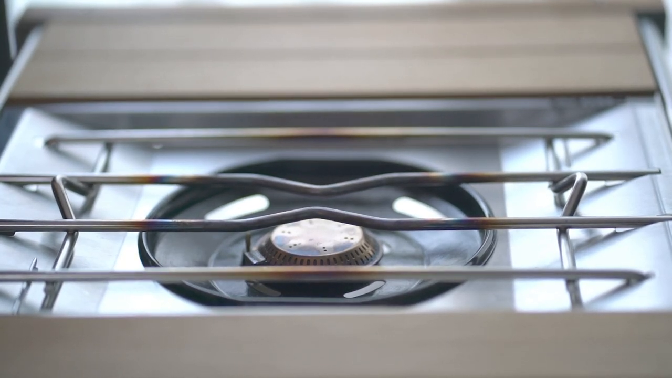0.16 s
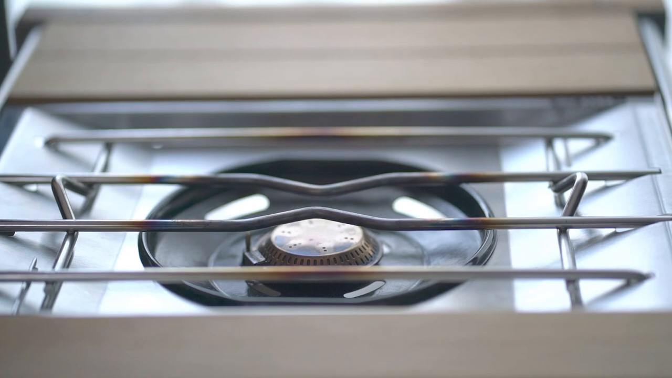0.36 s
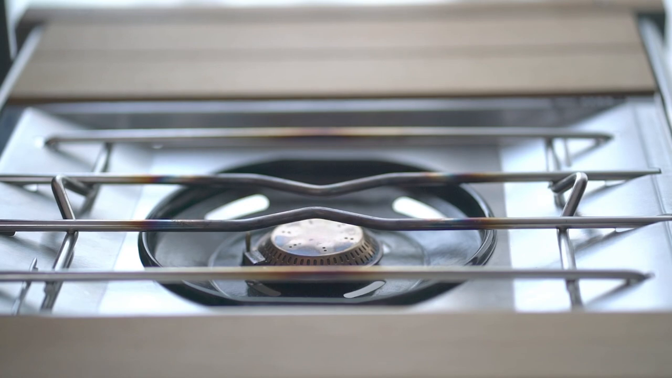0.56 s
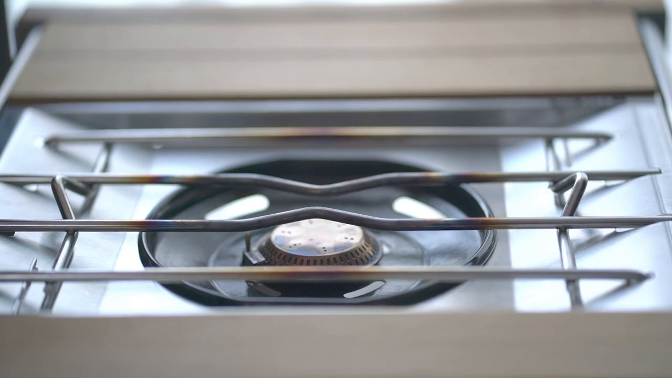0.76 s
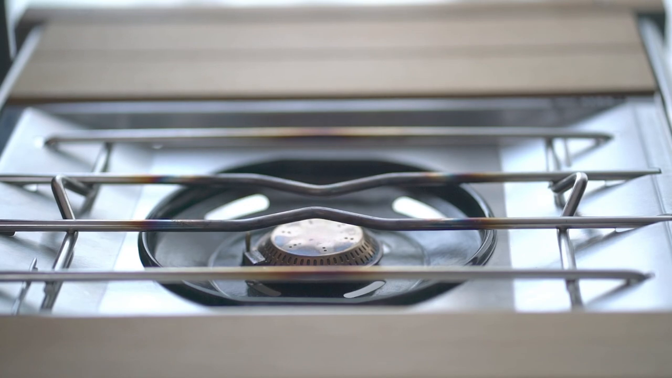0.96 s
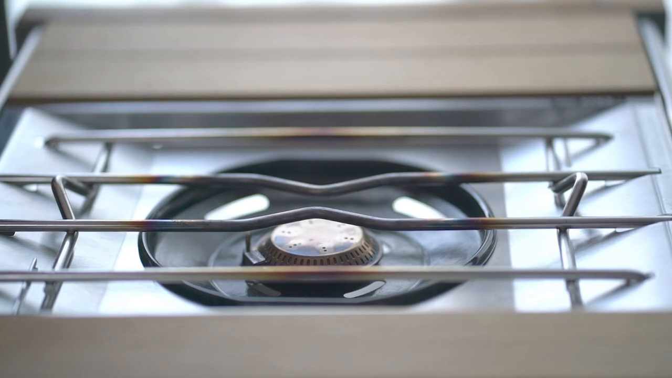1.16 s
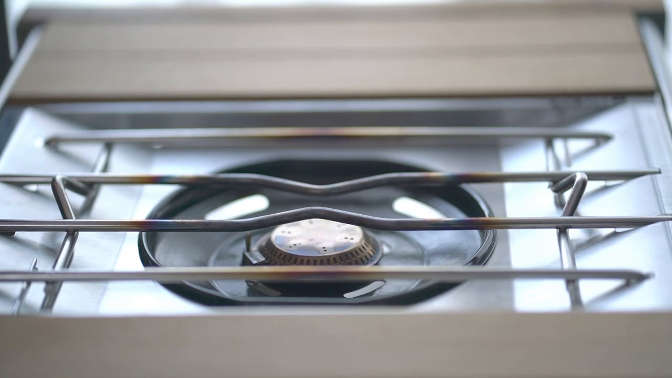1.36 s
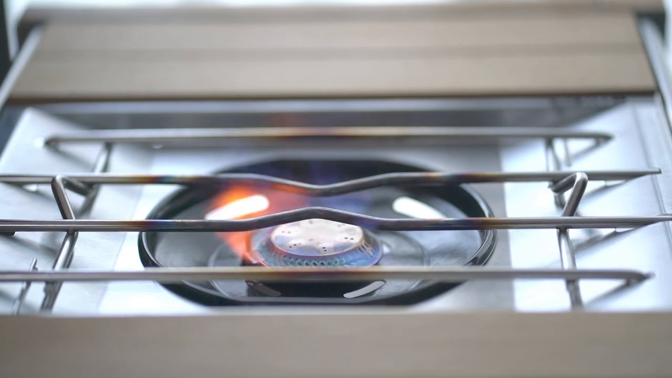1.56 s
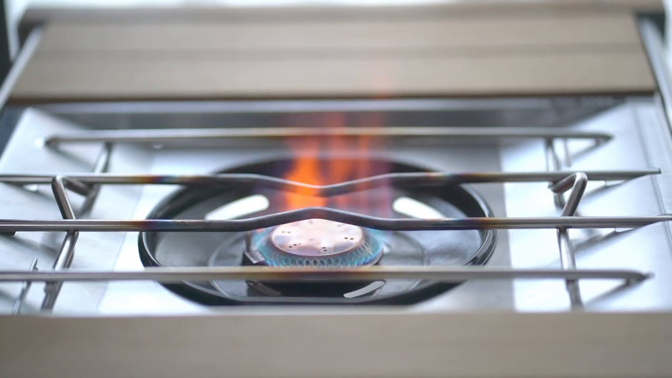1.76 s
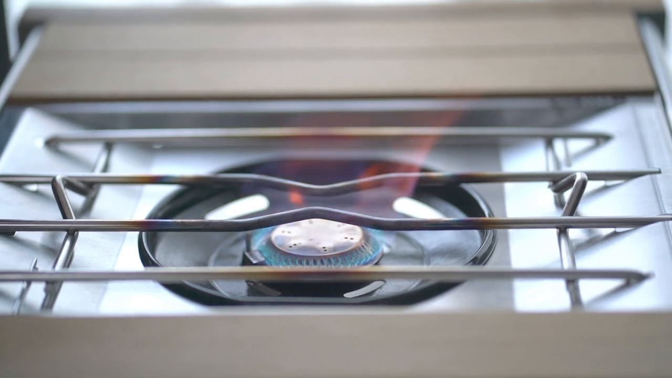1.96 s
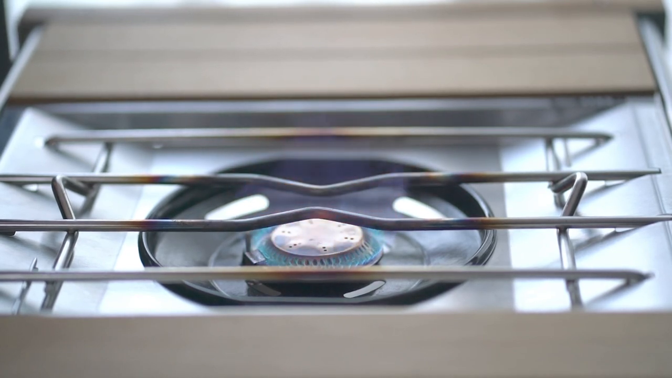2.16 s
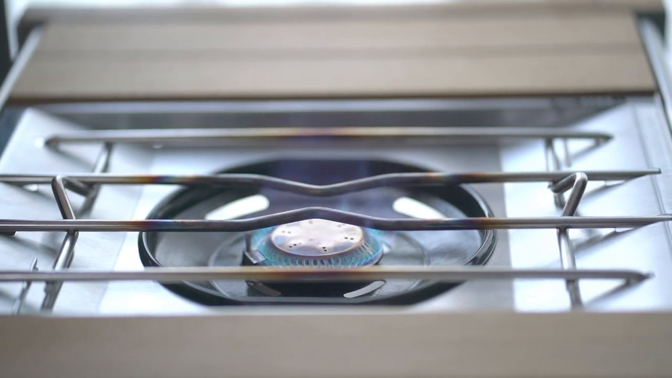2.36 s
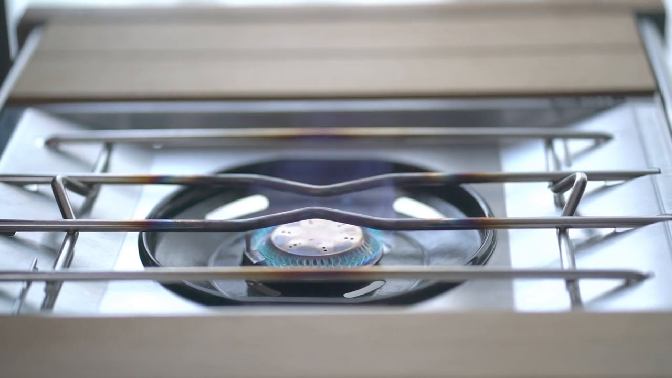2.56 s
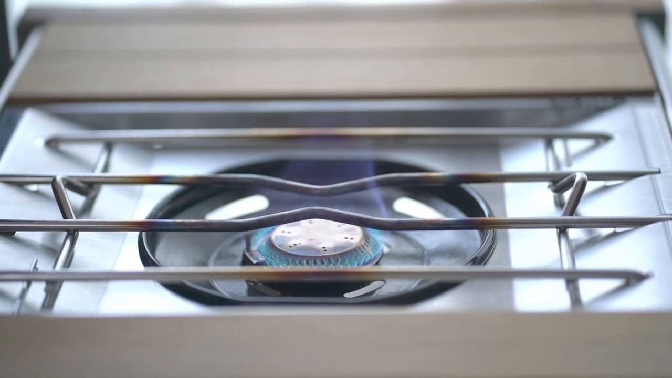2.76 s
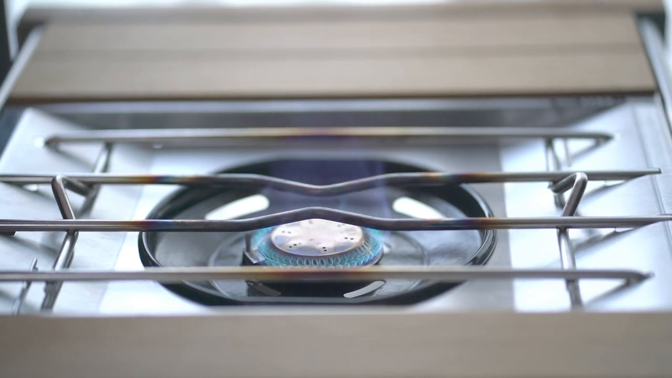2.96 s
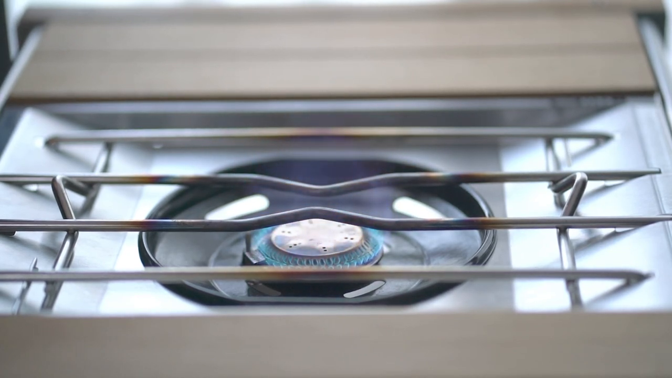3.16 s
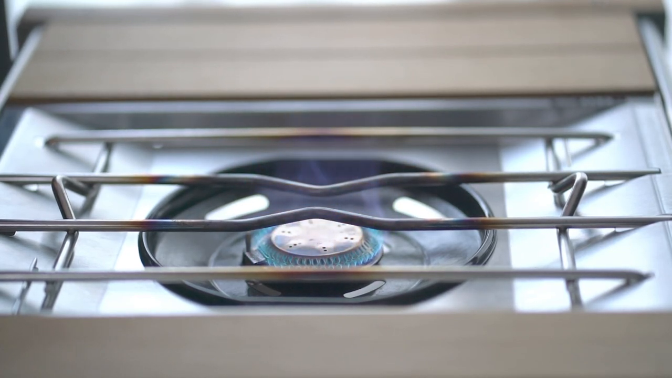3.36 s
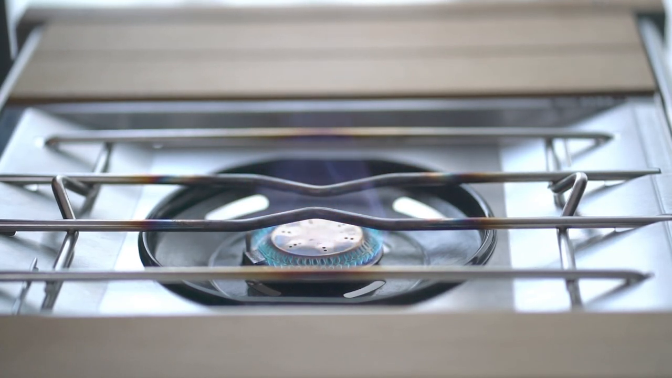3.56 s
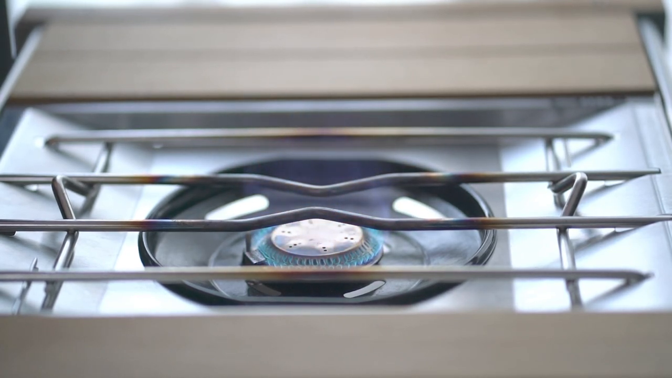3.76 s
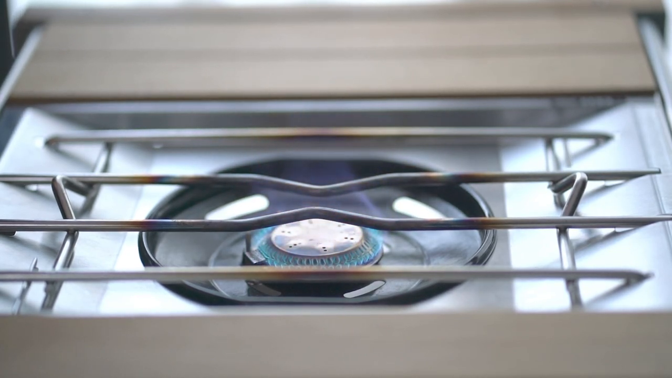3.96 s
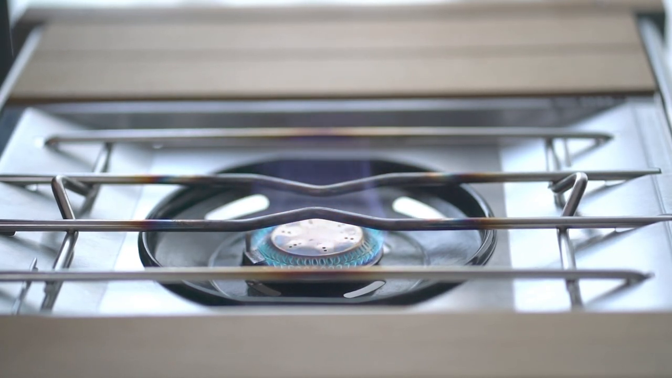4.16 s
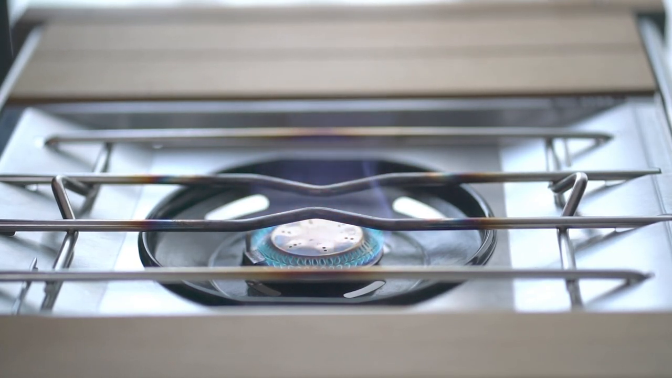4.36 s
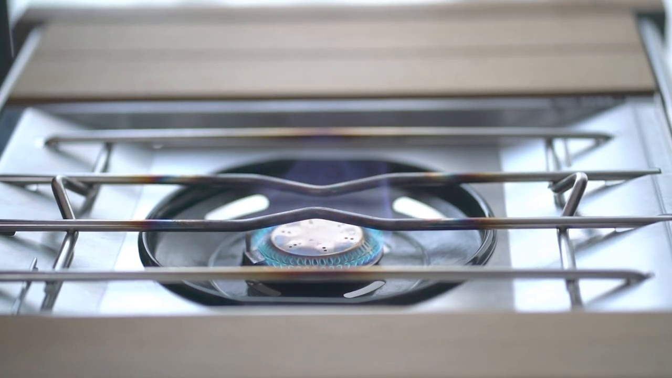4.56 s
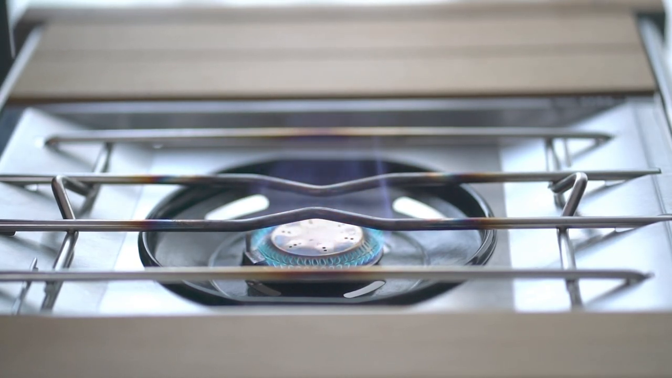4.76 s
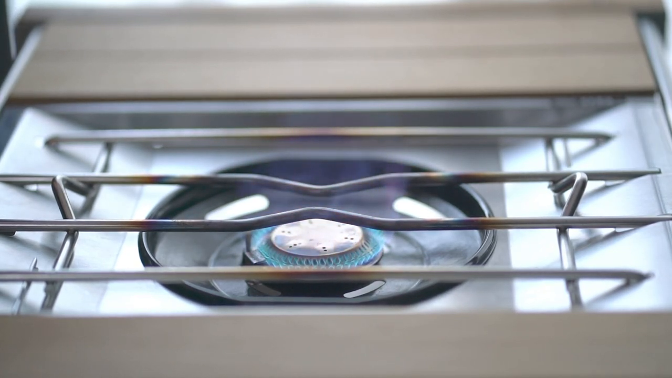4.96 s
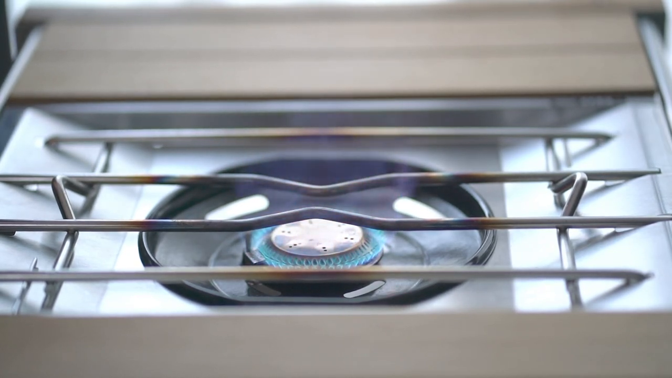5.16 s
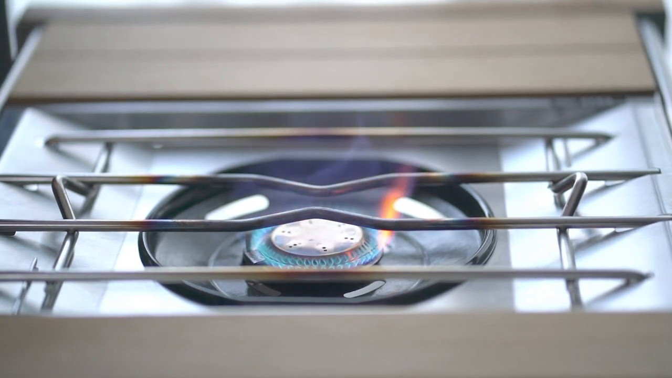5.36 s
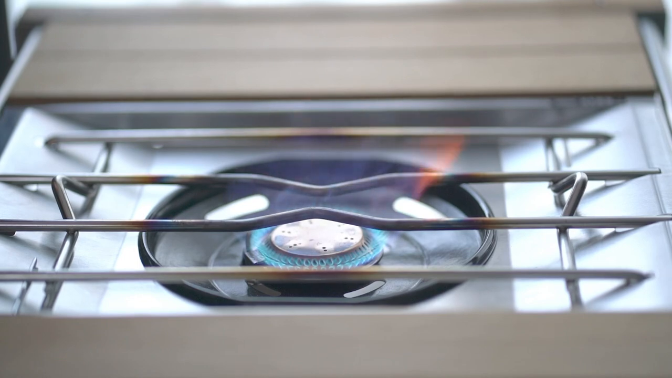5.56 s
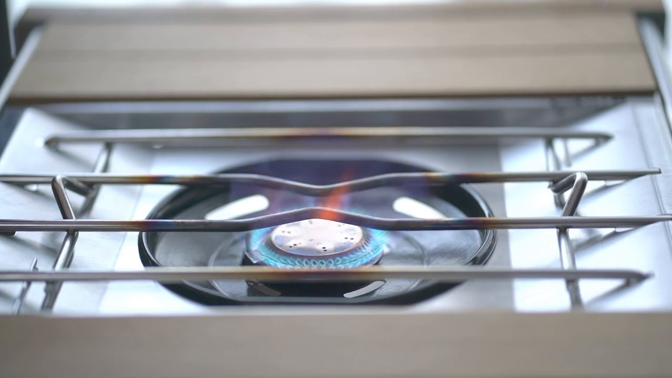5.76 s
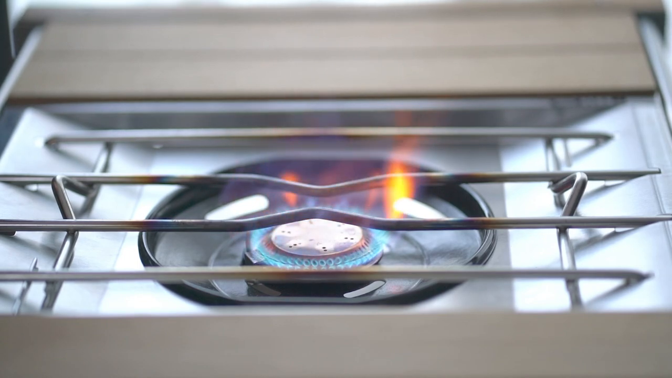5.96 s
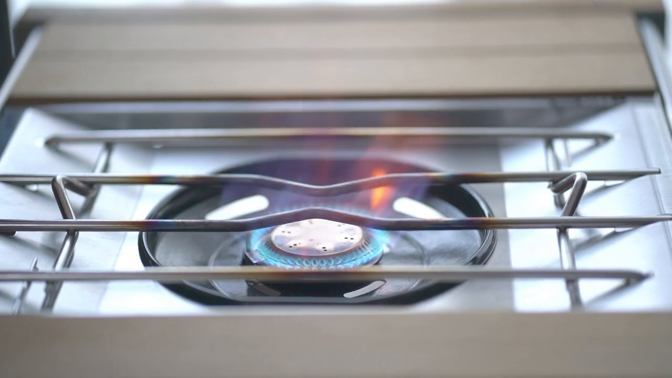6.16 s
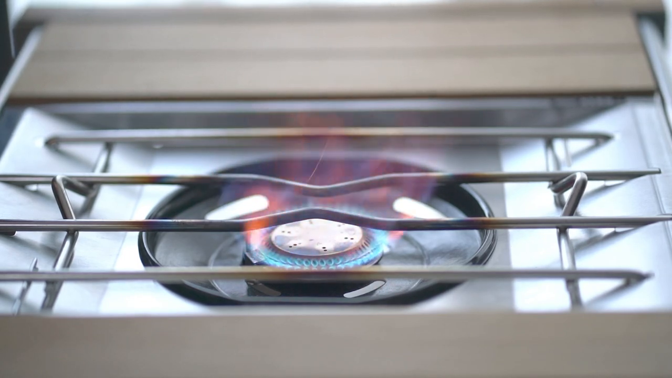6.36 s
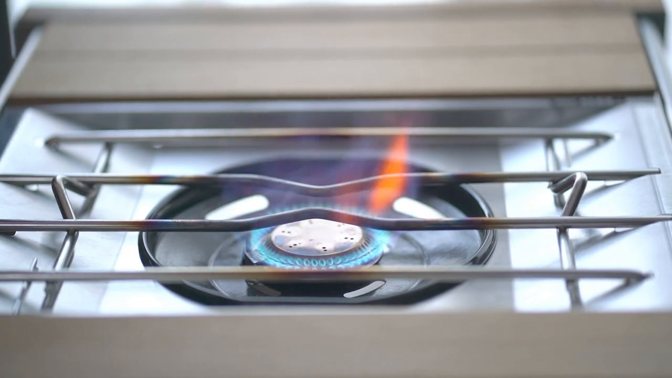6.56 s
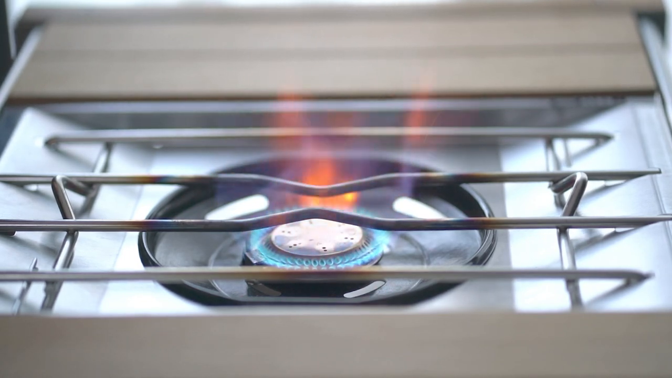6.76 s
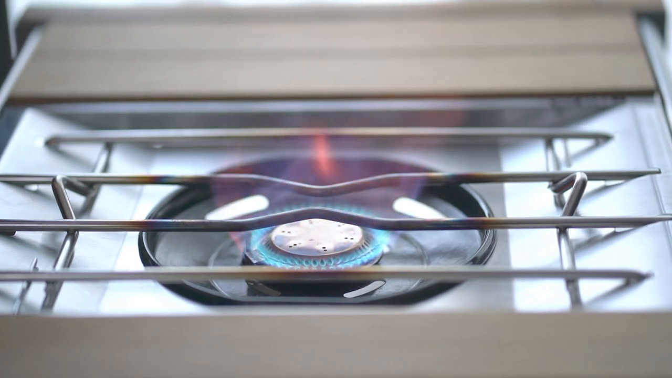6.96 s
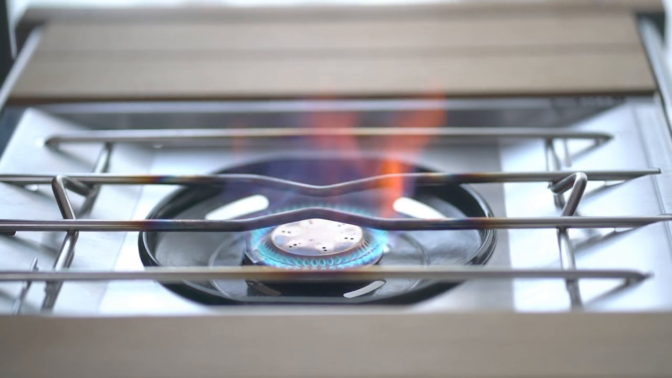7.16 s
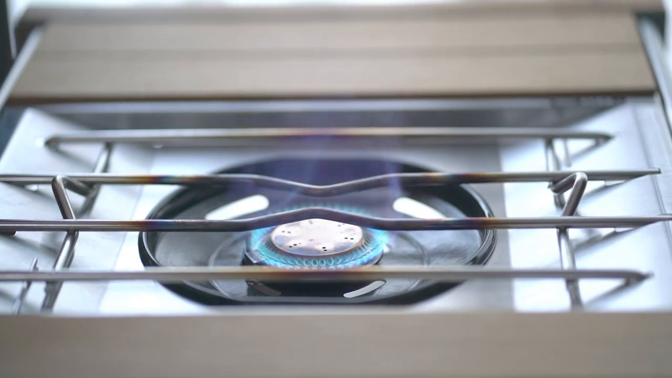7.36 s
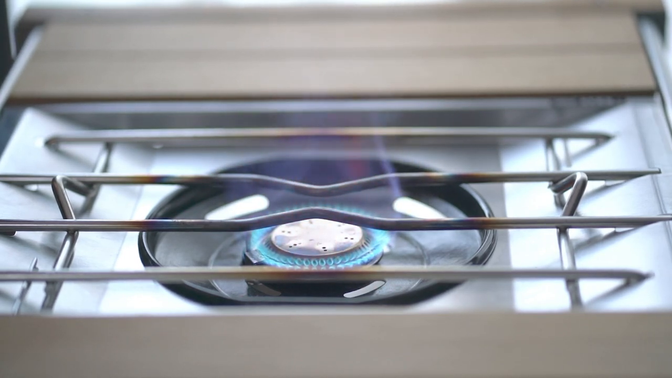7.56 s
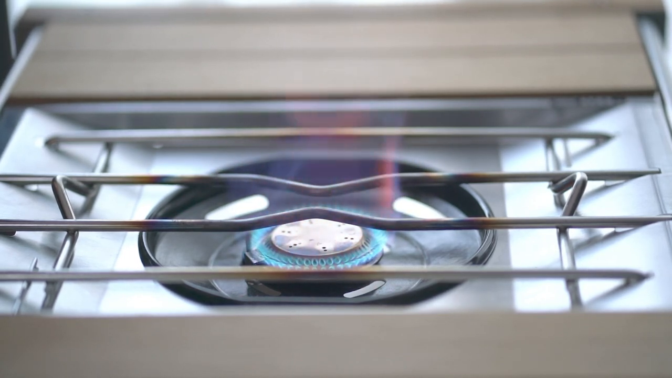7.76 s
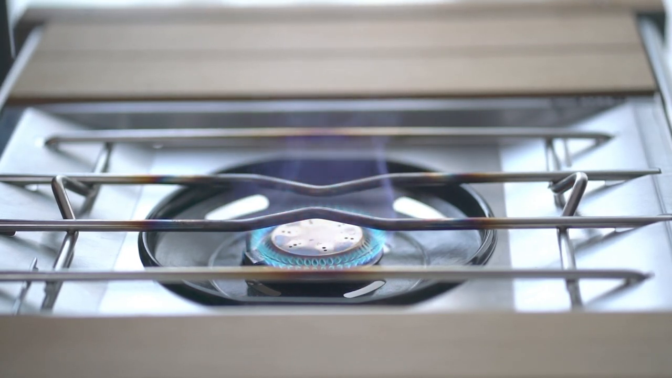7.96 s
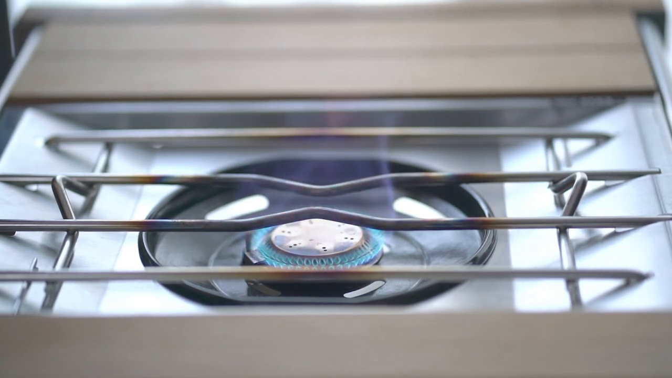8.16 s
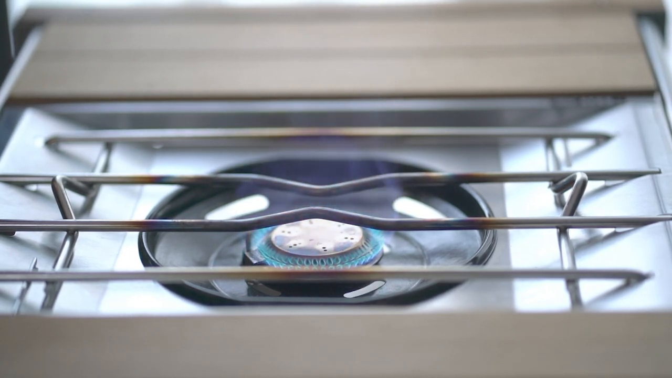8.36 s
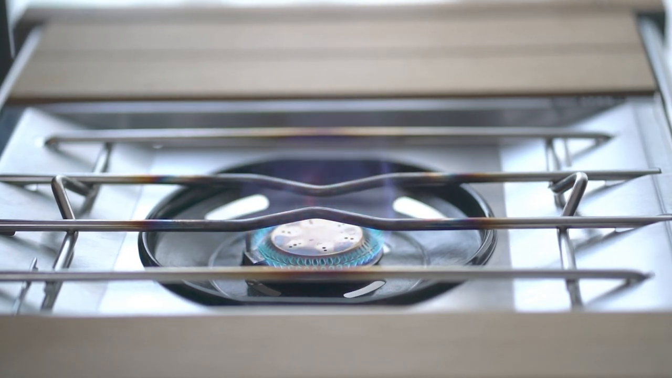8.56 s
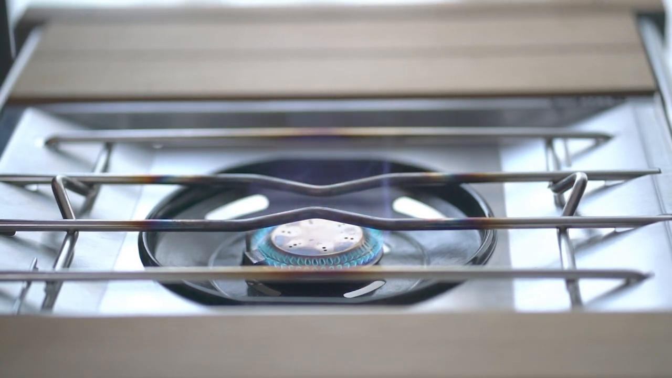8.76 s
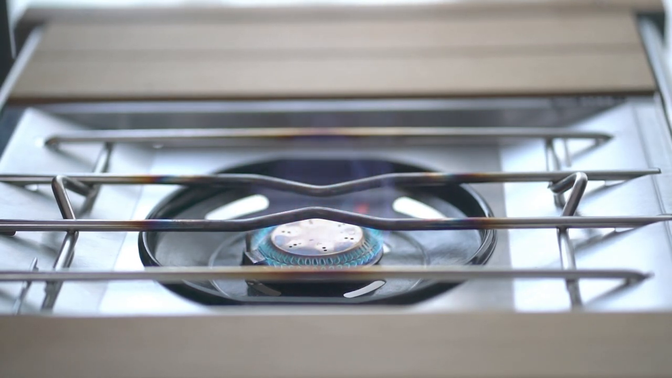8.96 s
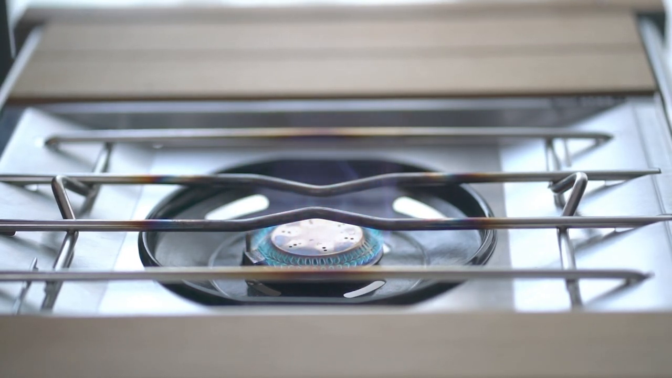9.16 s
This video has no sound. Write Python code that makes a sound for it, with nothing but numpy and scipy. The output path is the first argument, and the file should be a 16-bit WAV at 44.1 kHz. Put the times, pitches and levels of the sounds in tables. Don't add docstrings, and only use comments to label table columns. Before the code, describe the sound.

Gas begins to hiss from a camping stove burner, faint then stronger, with a thin singing tone. A hard spring igniter clacks and rings the sheet steel, the flame catches with a small soft whoomp, and the knob clicks back. The bright hiss dips, swells to a roaring peak, then eases away. Close stereo microphone outdoors, with low far traffic and a faint bird.

```python
import sys
import numpy as np
from scipy import signal
from scipy.fft import rfft, irfft, next_fast_len
from scipy.io import wavfile
from scipy.ndimage import uniform_filter1d, map_coordinates

SR = 44100
rng = np.random.default_rng(int(sys.argv[2]) if len(sys.argv) > 2 else 0)


def convert_level_to_amplitude(level_db):
    exponent = np.asarray(level_db, float) / 20
    return 10 ** exponent


def transcribe(signal):
    frames = np.atleast_2d(signal).T
    limited = np.clip(frames, -1, 1)
    pcm = np.round(limited * 32767).astype(np.int16)
    wavfile.write(sys.argv[1], SR, pcm)


N = 406602
LIT_S = 1.52


def unit(x):
    return x / np.sqrt(np.mean(x ** 2) + 1e-20)


def along(points, hz):
    f, v = np.transpose(points)
    return np.interp(np.log(hz + 1), np.log(f + 1), v)


def wobble(rate):
    knots = rng.standard_normal(int(N * rate / SR) + 4)
    return map_coordinates(knots, [np.arange(N) * rate / SR])


def peaks(modes, hz):
    return sum(convert_level_to_amplitude(2 * db) * (hz * width) ** 2 / ((centre ** 2 - hz ** 2) ** 2 + (hz * width) ** 2)
               for centre, width, db in modes)


def rush(power, patchy_db):
    z = rng.standard_normal((2, 257, N // 256 + 3, 2)) @ [1, 1j]
    field = uniform_filter1d(rng.standard_normal(z.shape[1:]), size=5, axis=0)
    field = uniform_filter1d(field, size=14, axis=1)
    pair = signal.istft(z * convert_level_to_amplitude(patchy_db * unit(field)), window="cosine", nperseg=512)[1][:, :N]
    m = next_fast_len(N + 8192, True)
    coarse = np.linspace(0, SR / 2, SR // 8)
    fine = np.fft.rfftfreq(m, 1 / SR)
    gain = [np.interp(fine, coarse, np.sqrt(p)) for p in power(coarse)]
    mid, side = irfft(rfft(pair, m) * gain, m)[:, :N]
    return np.array([mid + side, mid - side]) / np.std(mid)


# (f/Hz, width/Hz, level/dB)
AIR_MODES = [(235, 45, -3), (630, 50, -5), (775, 50, -1), (880, 60, -4), (1085, 50, -4)]


def spread(spectrum, side_db):
    def power(hz):
        mid = convert_level_to_amplitude(2 * along(spectrum, hz)) * (1 + 1.45 * peaks(AIR_MODES, hz))
        return mid * np.array([hz * 0 + 1, convert_level_to_amplitude(2 * along(side_db, hz))])
    return power


# (t/s, level/dB)
VALVE_FLOW = [(0, -65.5), (.2, -60.5), (.79, -51.5), (.97, -53), (1.1, -48), (1.6, -46.5), (2.8, -48),
              (3.05, -51), (3.75, -52.5), (4.6, -48), (5.0, -44.5), (5.65, -41), (6.0, -38), (6.75, -36.5),
              (7.76, -40), (8.4, -44.5), (8.8, -50.5), (9.22, -52)]


def valve():
    t, level_db = np.transpose(VALVE_FLOW)
    return np.interp(np.arange(N) / SR, t, level_db)


def flow_gain(jet_db):
    return convert_level_to_amplitude(jet_db + 3 + 0.33 * wobble(6) + 0.26 * wobble(18))


# (f/Hz, level/dB per Hz)
JET_FRONT = [(500, -29), (1200, -5.5), (2000, 0.5), (3000, -3), (4700, -3), (5900, -1), (6600, -6.5),
             (7200, -3.5), (8700, -1), (10200, -2), (12000, -5.5), (14000, -4), (14600, -8), (16000, -2.5)]
JET_SIDE = [(500, -57), (1200, -11), (2000, -16), (3050, -5), (4500, -9), (6000, -6), (6700, -14),
            (8600, -3), (11000, -8.5), (15000, -15), (16000, -14)]
# (f/Hz, width/Hz, level/dB at low flow, level/dB at full flow)
HEAD_MODES = [(2320, 70, 4, 6), (2390, 45, 6, 7), (2450, 35, 9, 12), (2535, 40, 8, 14), (2638, 50, 2, 9),
              (3400, 120, 1, -2), (3725, 60, 8, 5), (3905, 120, 8, 5), (4190, 70, 3, 3), (4540, 120, -2, 0),
              (4880, 120, -5, 3), (5125, 50, -2, 9), (5190, 35, 14, 9), (5340, 30, 11, 9),
              (5430, 30, 12, 9), (5490, 40, 5, 2), (5572, 40, 8, 11), (5830, 50, -2, 3), (7580, 60, 1, 4),
              (7730, 35, 7, 8), (7835, 70, 11, 10), (7920, 45, 9, 7), (8080, 90, 5, 9), (8200, 30, 2, 10),
              (8300, 50, -3, 4), (9150, 80, -2, 3), (9615, 90, 3, 8), (10900, 150, -3, 4),
              (11400, 300, -5, 1), (12900, 120, 0, 0)]
# (f/Hz, width/Hz, level/dB at low flow, level/dB at full flow)
FLANK_MODES = [(2210, 170, 0, -3.5), (2460, 130, 3, 7.5), (3850, 350, 0.5, -3), (5240, 91, 9.5, 10.5),
               (5480, 110, 10, 8.5), (7750, 170, 5.5, 7.5), (9300, 460, -5, -4), (9900, 330, -11, -3.5),
               (13600, 1500, -8, -5)]


def port_hiss(jet_db):
    low_db, full_db = -50, -41
    knots = rng.standard_normal((2, 1100))

    def comb_db(hz, k):
        return 3 * np.interp(hz / 22, np.arange(1100), knots[k])

    def colour(col):
        front = np.array(HEAD_MODES)[:, [0, 1, col]]
        flanks = np.array(FLANK_MODES)[:, [0, 1, col]]
        return lambda hz: [
            convert_level_to_amplitude(2 * (along(JET_FRONT, hz) + comb_db(hz, 0))) + peaks(front, hz),
            convert_level_to_amplitude(2 * comb_db(hz, 1)) * (convert_level_to_amplitude(2 * along(JET_SIDE, hz)) + peaks(flanks, hz))]

    flow = np.clip((jet_db - low_db) / (full_db - low_db), 0, 1)
    low = rush(colour(2), patchy_db=1.0)
    full = rush(colour(3), patchy_db=0.98)
    return np.sqrt(1 - flow) * low + np.sqrt(flow) * full


# (f/Hz, width/Hz, level/dB)
TUBE_MODES = [(2400, 50, 1), (2525, 40, 0), (3130, 200, -1), (3380, 150, 2), (3560, 150, 0), (3830, 50, 2),
              (4700, 300, -4), (5270, 40, -2), (5430, 40, 1), (7722, 45, 4), (7825, 45, 4), (9250, 50, 2)]


def mixing_tube():
    since_lit = np.clip(np.arange(N) / SR - LIT_S, 0, None)
    cold_db = -5 - 280 * since_lit
    return convert_level_to_amplitude(cold_db) * rush(lambda hz: peaks(TUBE_MODES, hz) ** 2 * convert_level_to_amplitude([[0], [-8]]), patchy_db=2.0)


# (f/Hz, level/dB per Hz)
TRAFFIC = [(30, -50), (90, -27), (160, -20), (210, -8.5), (350, -4), (550, -3), (780, 0), (1100, -1),
           (1500, -3), (2000, -7.5), (2800, -10.5), (4200, -16.5), (8000, -26), (16000, -34)]
# (f/Hz, side over mid level/dB)
TRAFFIC_SIDE = [(60, -28), (200, -24), (380, -15), (700, -9.5), (1300, -6.5), (2400, -1), (4400, -3),
                (15000, -4)]
# (f/Hz, width/Hz, level/dB)
ENGINE = (134, 18, -81.5)


def outdoors():
    hz, width, engine_db = ENGINE
    note = rush(lambda f: peaks([(hz, width, 0)], f) ** 2 * convert_level_to_amplitude([[0], [-60]]), patchy_db=2.5)
    traffic_db = -51.5 + .5 * wobble(2)
    traffic = convert_level_to_amplitude(traffic_db) * rush(spread(TRAFFIC, TRAFFIC_SIDE), patchy_db=0.88)
    return traffic + convert_level_to_amplitude(engine_db) * note


# (t/s, length/s, from f/Hz, to f/Hz, level/dB)
BIRD_NOTES = [
    (.2, .07, 1620, 1600, -63),
    (3.145, .05, 1580, 1620, -58),
    (3.19, .065, 1625, 1570, -55),
    (3.87, .09, 1780, 1830, -62),
    (4.06, .08, 1760, 1590, -60),
]


def bird():
    out = np.zeros(N + SR)
    for s, length, from_hz, to_hz, db in BIRD_NOTES:
        u = np.arange(round(length * SR)) / (length * SR)
        cycles = np.cumsum(from_hz + (to_hz - from_hz) * u) / SR
        swell = np.sin(np.pi * u) ** 0.55
        out[round(s * SR):][:len(u)] += convert_level_to_amplitude(db + 4) * swell * np.sin(2 * np.pi * cycles)
    return out[:N]


# (f/Hz, t60/s)
CASE_T60 = [(100, .3), (500, 0.18), (1300, 0.46), (3500, 0.38), (9000, 0.38), (15000, .25)]
# (f/Hz, likeness 0..1)
CASE_ALIKE = [(200, .98), (550, 1), (1650, 0.55), (5000, 0.23), (15000, 0.32)]
# (f/Hz, level/dB, t60/s)
PANEL_MODES = [(1230, -26, .25), (1515, -25, .2), (1565, -22, .3), (1629, -21, .27), (1686, -21, .3),
               (1971, -25, .36), (2285, -19, .25), (2713, -32, .5), (3316, -20, .35), (4048, -24, .21),
               (4325, -23, .25), (4362, -20, .3), (4421, -23, .25), (4539, -25, .5), (4794, -20, .35),
               (4823, -23, .3), (4942, -24, .5), (5642, -26, .4), (5700, -25, .3), (7359, -28, .35),
               (9545, -24, .15), (9625, -23, .23)]


def steel_shimmer(colour, stretch, t):
    noise = rng.standard_normal((2, len(t)))
    hz, frames, z = signal.stft(noise, SR, nperseg=256, noverlap=192)
    turn = np.arccos(np.clip(along(CASE_ALIKE, hz), 0, 1))[:, None] / 2
    mid, side = z[0] * np.cos(turn), z[1] * np.sin(turn)
    dying_db = -60 * frames / (stretch * along(CASE_T60, hz)[:, None])
    shaped = np.array([mid + side, mid - side]) * convert_level_to_amplitude(along(colour, hz)[:, None] + dying_db)
    shimmer = signal.istft(shaped, SR, nperseg=256, noverlap=192)[1][:, :len(t)]
    return shimmer / np.std(shimmer[:, :800]) * (1 - np.exp(-t / 0.00048))


def panel_ring(stretch, t):
    ring = 0
    for hz, level, t60 in PANEL_MODES:
        level_db = level + rng.normal(0, 0.65, (2, 1)) - 60 * t / (stretch * t60)
        phase = rng.random() + rng.normal(0, 0.21, (2, 1))
        ring = ring + convert_level_to_amplitude(level_db) * np.sin(2 * np.pi * (hz * t + phase))
    return ring * (1 - np.exp(-t / 0.00057))


def blows(table, colour, stretch):
    out = np.zeros((2, N + SR))
    t = np.arange(SR // 4) / SR
    for s, shimmer_db, contact_hz, contact_db, ring_db in table:
        cycles = contact_hz * t
        contact = np.sin(2 * np.pi * cycles) * np.exp(-((cycles - 1.7) / 0.87) ** 2)
        blow = convert_level_to_amplitude(contact_db) * contact + convert_level_to_amplitude(shimmer_db) * steel_shimmer(colour, stretch, t)
        out[:, round(s * SR):][:, :len(t)] += blow + convert_level_to_amplitude(ring_db) * panel_ring(stretch, t)
    return out[:, :N]


# (f/Hz, level/dB per Hz)
CASE_COLOUR = [(60, -50), (250, -36), (450, -15), (900, -24), (1200, -7.5), (1700, -4), (2250, -3),
               (2550, -15), (3400, -8), (4400, 0.5), (5200, -8), (5800, -3), (9600, -8), (15800, -14)]
# (t/s, shimmer level/dB, contact f/Hz, contact level/dB, panel ring level/dB)
HAMMER_BLOWS = [
    (1.5193, -23, 2030, -12, -6.5),
    (1.5196, -39, 4380, -8, -23),
    (1.5237, -23, 1760, -11, -15.5),
    (1.5335, -28, 1700, -12, -14.5),
    (1.519, -60, 90, -59, -50),
    (1.527, -60, 430, -42, -52),
    (1.605, -60, 520, -38, -50),
]


def igniter_hammer():
    return blows(HAMMER_BLOWS, CASE_COLOUR, stretch=0.89) * convert_level_to_amplitude([[.4], [-.4]])


# (f/Hz, level/dB per Hz)
ROAR = [(130, -62), (170, -9.5), (220, -0.5), (370, -2), (600, 0), (850, 0), (1300, -4.5), (2000, -14),
        (3000, -40)]
# (f/Hz, side over mid level/dB)
ROAR_SIDE = [(200, -46), (500, -23), (1000, -15), (2000, -6)]
# (f/Hz, level/dB per Hz)
RUMBLE = [(20, -60), (45, -34), (65, -11), (90, -2), (125, -1), (150, -25), (200, -31)]


def flame(jet_db):
    since_lit = np.clip(np.arange(N) / SR - LIT_S, 0, None)
    over_db = 1.53 * np.logaddexp(0, (jet_db + 48) / 1.47)
    whoomp_db = 5 * np.exp(-since_lit / 0.11)
    flutter = wobble(9)
    roar_db = -60.5 + 1.266 * over_db + whoomp_db + 0.2 * flutter
    rumble_db = -79 + 0.88 * over_db + whoomp_db + 1.8 * flutter
    roar = convert_level_to_amplitude(roar_db) * rush(spread(ROAR, ROAR_SIDE), patchy_db=0.5)
    rumble = convert_level_to_amplitude(rumble_db) * rush(spread(RUMBLE, [(100, -36)]), patchy_db=0)
    catching = np.clip(since_lit / .024, 0, 1)
    return catching * (roar + rumble)


# (f/Hz, level/dB per Hz)
SPINDLE_COLOUR = [(60, -50), (900, -36), (1500, 0), (2000, -14), (2600, -5), (3000, -10), (3400, 0),
                  (4000, -8), (5000, -13), (6500, -11), (8200, -6), (9600, -7), (10500, -14), (15800, -14)]
# (t/s, shimmer level/dB, contact f/Hz, contact level/dB, panel ring level/dB)
KNOB_BLOWS = [
    (1.781, -30.5, 1524, -27, -35),
    (1.7815, -45, 3300, -27, -40),
    (1.7828, -38, 1530, -30, -32),
    (1.7865, -46, 8600, -26, -32),
    (7.415, -46, 4000, -36, -50),
    (7.635, -48, 4000, -28, -50),
]


def knob():
    return blows(KNOB_BLOWS, SPINDLE_COLOUR, stretch=.48)


# (t/s, length/s, level/dB over the jet)
FLARES = [
    (4.27, 0.58, -14),
    (4.87, .11, -9),
    (5.05, 0.17, -10),
    (7.41, .02, -8),
    (7.63, .03, -6.5),
    (7.7, 0.17, -16),
    (7.97, 0.12, -9.5),
    (8.3, .4, -13),
]
# (f/Hz, width/Hz, level/dB)
PORT_MODES = [(3520, 42, -8.5), (3950, 32, 4), (4000, 130, 2), (4200, 100, 0.5)]


def port_whistle():
    t = np.arange(N) / SR
    gain = 0
    for s, length, db in FLARES:
        outside_s = np.clip(np.maximum(s - t, t - s - length), 0, None)
        gain = gain + convert_level_to_amplitude(db - 350 * outside_s)
    return gain * rush(lambda hz: peaks(PORT_MODES, hz) ** 2 * convert_level_to_amplitude([[0], [-14]]), patchy_db=.8)


def scene():
    jet_db = valve()
    gas = flow_gain(jet_db) * (port_hiss(jet_db) + mixing_tube() + port_whistle())
    stove = gas * convert_level_to_amplitude([[-.25], [.25]]) + flame(jet_db)
    igniter = igniter_hammer() + knob()
    return stove + igniter + bird() + outdoors() * convert_level_to_amplitude([[-.3], [.3]])


def low_pass(x):
    return signal.sosfilt(signal.butter(12, 16800, fs=SR, output="sos"), x)


def record(dry):
    m = next_fast_len(N, True)
    passband = np.fft.rfftfreq(m, 1 / SR) < 15730
    limited = irfft(rfft(dry, m) * passband, m)[:, :N]
    return low_pass(limited)


dry = scene()
out = record(dry)
transcribe(out)
```